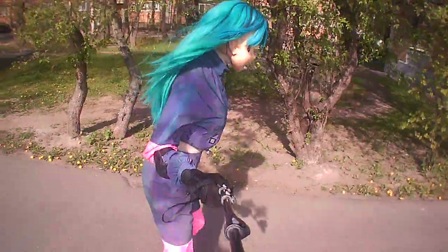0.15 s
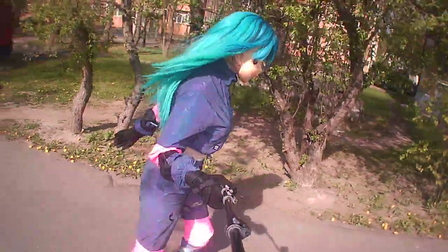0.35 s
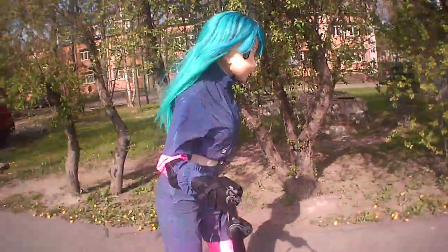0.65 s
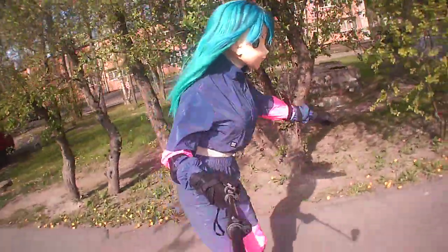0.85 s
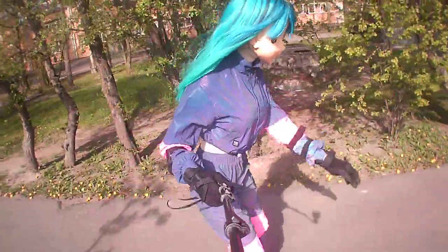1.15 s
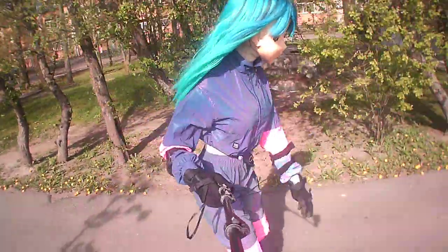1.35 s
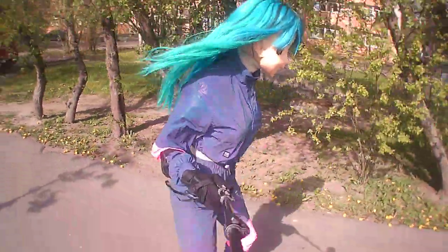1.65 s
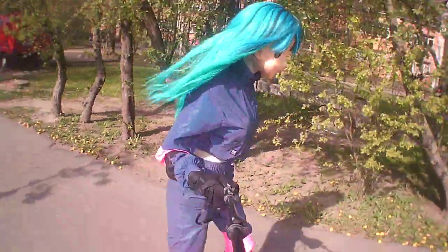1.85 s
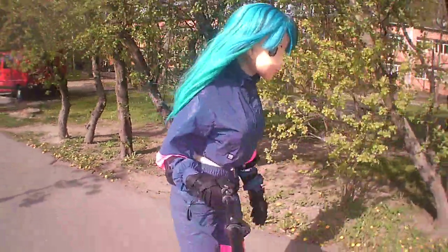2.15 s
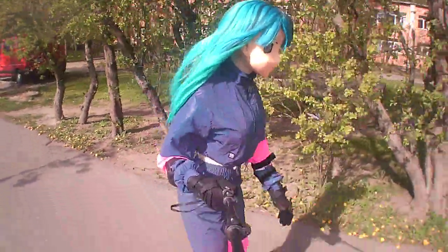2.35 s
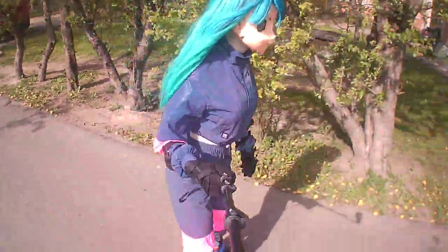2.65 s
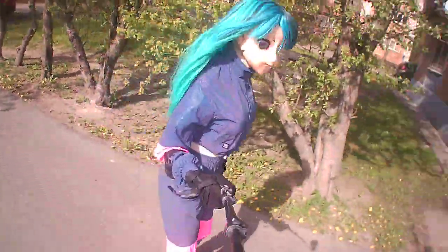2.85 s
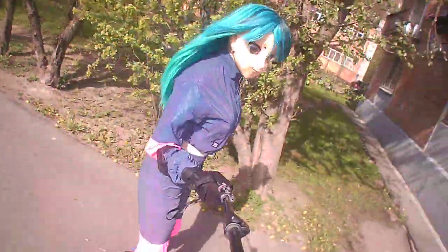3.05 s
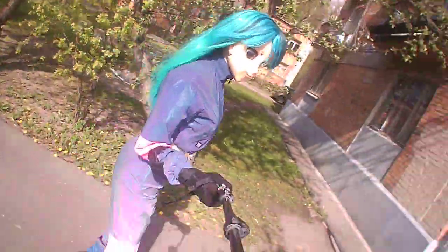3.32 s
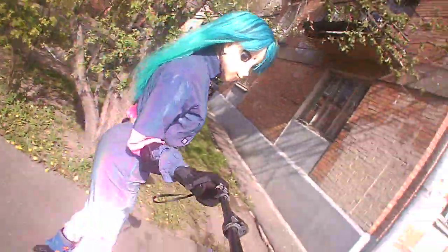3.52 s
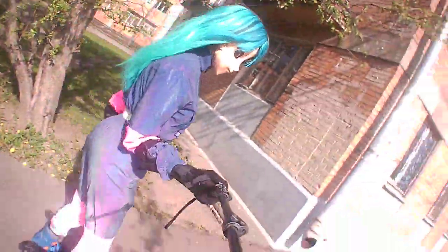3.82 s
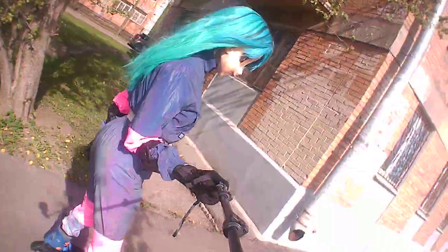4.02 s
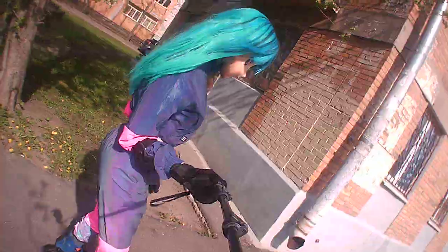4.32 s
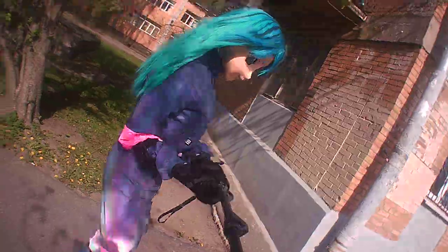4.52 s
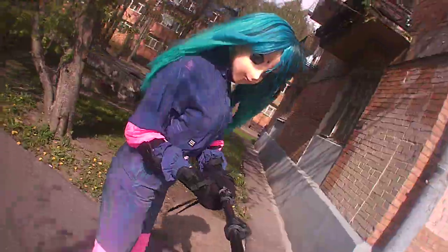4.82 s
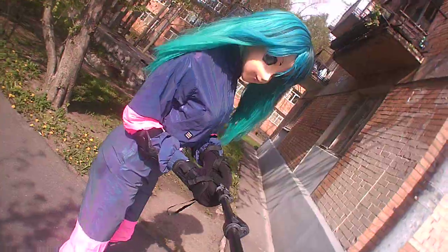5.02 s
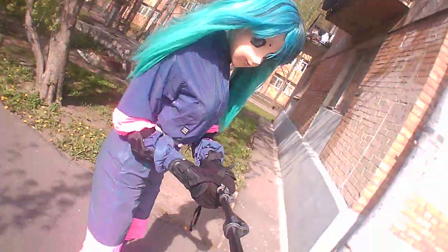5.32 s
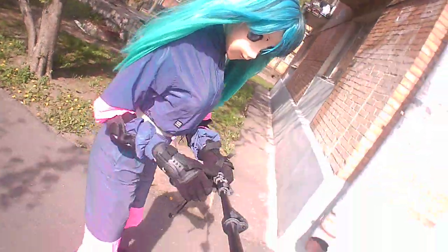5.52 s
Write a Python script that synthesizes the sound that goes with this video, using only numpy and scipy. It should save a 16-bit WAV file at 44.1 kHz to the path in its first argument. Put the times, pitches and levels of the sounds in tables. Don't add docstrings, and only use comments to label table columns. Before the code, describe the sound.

Heavy handling noise from a camera on a pole: deep overloaded thumps, plastic clamp knocks and scrapes, over faint wheel rumble outdoors.

```python
import sys
import numpy as np
from scipy import signal
from scipy.fft import rfft, irfft, next_fast_len
from scipy.io import wavfile
from scipy.ndimage import uniform_filter1d, map_coordinates

SR = 44100
rng = np.random.default_rng(int(sys.argv[2]) if len(sys.argv) > 2 else 0)


def volts_from_decibels(level):
    exponent = np.asarray(level, float) / 20
    return 10 ** exponent


def to_wav(s):
    ch = np.atleast_2d(s).T
    pcm = np.round(np.clip(ch, -1, 1) * 32767)
    wavfile.write(sys.argv[1], SR, pcm.astype(np.int16))


N = 250036
T = np.arange(N) / SR


def unit(x):
    return x / np.sqrt(np.mean(x ** 2) + 1e-20)


def curves(rows):
    s, *columns = np.transpose(rows)
    return [np.interp(T, s, column) for column in columns]


def wobble(rate):
    return map_coordinates(rng.standard_normal(int(N * rate / SR) + 4), [T * rate])


def filtered(x, response):
    m = next_fast_len(N + SR // 2)
    return irfft(rfft(x, m) * response(np.fft.rfftfreq(m, 1 / SR)), m)[:N]


def noise(spectrum):
    f, db = np.transpose(spectrum)

    def colour(hz):
        return volts_from_decibels(np.interp(np.log(hz + 1), np.log(f + 1), db))
    return unit(filtered(rng.standard_normal(N), colour))


def resonant(x, modes, damping):
    def response(f):
        total = 0
        for k, (hz, db, t60) in enumerate(modes):
            width = damping * np.log(1000) / (np.pi * t60)
            total = total + (-1) ** k * volts_from_decibels(db) * 1j * f * width / (hz * hz - f * f + 1j * f * width)
        return total
    return unit(filtered(x, response))


def grit(rate, clump_db):
    sizes = rng.standard_normal(N) * volts_from_decibels(np.minimum(3 * rng.exponential(size=N), 8))
    return (rng.random(N) < rate / SR) * sizes * volts_from_decibels(clump_db * np.tanh(wobble(90)))


def soft(x, hz):
    return filtered(x, lambda f: 1 / (1 + 1j * f / hz) ** 2)


# start in seconds, signed size (1 = full scale), swing in Hz, t60 in seconds.
JOLTS = [(0.5605, 1.01, 16.6, 0.6), (0.6065, -0.62, 22.3, 0.949), (0.6451, -2.44, 39.4, 0.113),
         (1.1659, 2.23, 16.1, 0.105), (1.8202, -1.5, 9.9, 0.167), (1.9463, 0.98, 40.1, 0.439),
         (1.948, -3.77, 17.7, 0.563), (1.9867, 5.94, 12.9, 0.251), (2.0587, -0.68, 7.5, 0.603),
         (2.1532, -1.47, 6.9, 0.84), (2.2909, 0.72, 27.0, 0.302), (2.4882, -0.55, 5.0, 0.96),
         (2.5869, 0.53, 18.4, 0.369), (2.828, 2.56, 17.8, 0.447), (2.8458, -3.61, 35.0, 0.06),
         (2.8821, -0.52, 39.2, 0.354), (2.9436, -0.85, 19.5, 0.411), (4.2298, 1.15, 13.8, 0.137),
         (4.5869, 1.14, 24.2, 0.163), (4.678, 0.67, 39.8, 0.181), (4.6955, -0.79, 13.4, 0.659),
         (4.7298, -6.0, 18.6, 0.585), (4.8084, -3.38, 26.1, 0.253), (4.8192, 1.62, 32.1, 0.553),
         (4.9859, 0.71, 11.6, 0.272), (5.0943, -0.76, 24.7, 0.96), (5.1471, -2.5, 14.9, 0.874),
         (5.1837, -0.53, 37.8, 0.445), (5.3161, -0.72, 16.8, 0.96), (5.362, -0.66, 9.2, 0.956)]
LEFTOVER = (-.022, -.34, 11, .3)
# start in seconds, signed size (1 =
# full scale), swing in Hz.
SHORT_SWINGS = [(0.529, 0.19, 11.7), (0.5806, -0.76, 53.2), (0.5854, 1.33, 121.7), (0.743, -0.58, 18.6),
                (1.1238, 0.36, 13.4), (1.1705, 0.71, 82.2), (1.207, -0.35, 9.5), (1.8045, -0.17, 88.8),
                (1.9515, -2.88, 61.4), (2.191, 0.25, 45), (2.3128, -0.38, 41.9), (2.5324, -0.37, 20.3),
                (2.8737, -0.57, 100.1), (2.9089, -1.01, 32.8), (3.0491, 0.6, 20.7), (3.4641, 0.63, 14.1),
                (3.5776, 0.24, 35.3), (4.2277, 0.36, 97.9), (4.2462, 0.39, 88.7), (4.3402, -0.4, 12.0),
                (4.5761, -0.78, 43.6), (4.6147, -0.33, 90.9), (4.7451, 2.4, 44.4), (4.8594, -0.72, 41.8),
                (4.9092, 0.81, 53.6), (5.2152, -0.39, 75.8), (5.3873, 0.32, 8.9), (5.3932, -0.59, 46.6),
                (5.4733, -0.82, 19.4), (5.628, 0.79, 22.0),
                (0.7002, -0.48, 47.6), (0.7664, -0.29, 14.0), (1.1823, -0.52, 21.8), (1.8753, -0.31, 34.1),
                     (1.9379, 0.47, 21.8), (2.3025, 0.45, 17.5), (2.5125, -0.33, 21.8), (2.5438, 0.78, 19.5),
                     (2.6109, -0.52, 12.5), (4.576, -0.35, 17.5), (4.6163, -0.44, 8.9), (4.6399, 0.45, 47.6),
                     (4.6875, 0.51, 83.2), (4.7451, 0.9, 42.6), (4.9143, 0.42, 11.2), (4.9773, -0.34, 38.1),
                     (5.0349, -0.74, 42.6), (5.073, 0.38, 38.1), (5.0948, 0.52, 27.3), (5.1383, -0.41, 53.3),
                     (5.2444, 0.56, 53.3), (5.3061, 0.34, 42.6), (5.3655, 0.37, 27.3),
                (.556, -.4, 35), (.6255, .35, 60), (.65, .6, 45), (.664, .3, 12), (1.14, .35, 6.5),
                    (2.15, .32, 2.5), (2.16, .3, 12), (2.851, -.25, 25), (2.016, .25, 60), (2.066, -.2, 30),
                    (2.919, -.4, 30), (3.559, .22, 60), (4.713, -.6, 30), (4.7415, 1.3, 48), (4.7425, .4, 40),
                    (4.7548, .7, 125), (4.753, -.35, 36), (4.8, -.2, 30), (5.085, -.45, 6.5), (5.166, .85, 40),
                    (5.258, .35, 14), (5.401, .35, 22)]


def jolts():
    cycles_to_die = 4
    short_swings = [(s, size, hz, cycles_to_die / hz) for s, size, hz in SHORT_SWINGS]
    swing = np.zeros(N)
    for s, size, hz, t60 in [LEFTOVER] + JOLTS + short_swings:
        first = max(round(s * SR), 0)
        t = T[first:first + round(t60 * SR)] - s
        swing[first:first + len(t)] += size * np.sin(2 * np.pi * hz * t) * volts_from_decibels(-60 * t / t60)
    return swing


def unrest(swing):
    fast_per_s = 64
    speed = np.abs(np.gradient(swing)) * SR
    return np.tanh(uniform_filter1d(speed, SR // 30) / fast_per_s)


# time in seconds, strength in dB.
AIR = [(0, -7.5), (.13, -16), (.5, -20), (1, -21.5), (1.2, -12), (1.55, -26), (1.9, -12), (2.35, -18),
       (2.55, -6.5), (2.85, -17.5), (3.1, -22.5), (3.55, -24), (4.1, -15.5), (4.35, -24), (4.6, -10.5),
       (4.85, -22.5), (5.1, -10.5), (5.67, -25)]
# frequency in Hz, level in dB per Hz.
SWAY_COLOUR = [(2, -49.5), (6, 11.5), (18, 14), (28, 4), (45, 0), (70, -89)]
BUFFET_COLOUR = [(25, -55.5), (55, -15), (80, -14.5), (150, -31), (400, -52.5), (1500, -110)]


def pole(swing):
    buffet_db, buffet_grows, stirred_db = -32.5, 0.45, 39.5
    loose = 1 / (1 + 4 * uniform_filter1d(np.abs(swing), SR // 12))
    sway_db, = curves(AIR)
    mean_db = sway_db.mean()
    gust_db = mean_db + buffet_db + buffet_grows * (sway_db - mean_db) + stirred_db * unrest(swing)
    sway = volts_from_decibels(sway_db) * noise(SWAY_COLOUR)
    buffet = unit(volts_from_decibels(0.88 * np.tanh(wobble(22))) * noise(BUFFET_COLOUR))
    rounded = signal.filtfilt(*signal.butter(1, 300, fs=SR), swing)
    return rounded + loose * (sway + volts_from_decibels(gust_db) * buffet)


# start in seconds, peak of the main modes in dB, then low, middle and bright modes in dB.
BLOWS = [
    (1.9497, -13.5, -9, -9, -5.5),
    (4.7245, 9.5, -11, -9, -22.5),
    (4.756, -11.5, -7, -5.5, -21.5),
    (5.171, -16.5, -2.5, -5.5, -38),
]
# start in seconds, peak of the main modes in dB, low modes in dB,
# middle modes in dB, tilt of the main modes in dB an octave.
KNOCKS = [(0.2763, -24.5, -15.5, -17, 22), (0.372, -52.5, 6.5, 7.5, -1), (0.449, -45.5, -3.5, -4, -5),
          (0.561, -22.5, -7.5, -5, -12), (0.623, -21, -8, -6.5, 5), (0.8938, -41.5, -6, -11, .1),
          (0.9829, -38.5, -13.5, -12, 9), (1.1211, -39.5, 7.5, 0.5, 4), (1.1405, -27.5, -1.5, -5, 10),
          (1.1653, -28.5, -17, -5, 4), (1.201, -34.5, -11, -8.5, 5), (1.6629, -41.5, -19, -14.5, 9),
          (1.8, -32, -7, -12, -3), (1.8477, -37, -8.5, -10, 1), (1.9415, -25.5, -9, -12, 8),
          (2.038, -34.5, -10, -13, 3), (2.0601, -27, -9, -14, 11.5), (2.1927, -33, -6, -9.5, -5),
          (2.641, -38.5, -20.5, -21, 10), (2.7763, -34, 2.5, -3, 5), (2.876, -26.5, -5, -15, -6),
          (2.9199, -34, 0, -12, -1), (3.054, -35.5, -6.5, -6, 4), (3.2762, -52, -2, 6, .1),
          (3.3174, -40, -16, -16, 8), (3.4229, -23.5, -26, -9, 27), (3.5058, -36.5, -19, 1, 2),
          (3.5585, -35.5, 10.5, 1, -1), (3.8003, -39, -33, 0, -2), (4.234, -18, -20, -11.5, -34),
          (4.474, -41, -6.5, -6, 1), (4.567, -33, 1, -1, 6), (4.636, -42, 9.5, -2, -3.5),
          (4.683, -27.5, 1.5, -14, 2), (4.7463, -18, -11.5, -7, 7), (4.966, -33, -14, -19, 13),
          (5.096, -38, -1.5, -12, 2), (5.2709, -25.5, -4, -7, -5), (5.305, -25, -6.5, -8, 2)]
# start in seconds, peak of the main modes in dB,
# low modes in dB, bright modes in dB, share of the free ring time.
SNAPS = [(0.4847, -31.5, -3.5, -9.5, 0.33), (0.5668, -13, -8.5, -18, 0.29), (0.659, -23.5, -18, -18, 0.28),
         (0.7018, -47, -6, -8.5, .4), (1.3922, -43, -8, -17, 0.89), (2.0547, -20.5, -26, -8.5, 0.29),
         (2.124, -35, -3.5, -23, 0.25), (2.2872, -23, -11, -15, 0.33), (2.8463, -28.5, 5, -15, 0.091),
         (2.8908, -18, -6.5, -10.5, 0.23), (2.929, -30.5, -0.5, -9.5, 0.23), (3.4467, -33, -4.5, -17, 0.77),
         (4.7616, -22, -16, -11, .15), (4.7638, -3, -18, -12.5, 0.114), (4.9143, -14.5, -7, -19, 0.19)]
# start in seconds, peak of the main modes in dB.
TAPS = [(0.049, -51.5), (0.183, -53.5), (0.3268, -50), (0.342, -47.5), (0.388, -50), (1.273, -60),
        (1.3348, -51.5), (1.8184, -45), (2.08, -46), (2.158, -44.5), (2.434, -55), (2.475, -40.5),
        (2.525, -42.5), (2.5364, -46), (2.591, -52), (2.61, -52.5), (2.957, -57), (2.985, -47),
        (2.687, -50.5), (2.968, -47), (2.9994, -38.5), (3.204, -49), (3.297, -43.5), (3.598, -52.5),
        (3.663, -49), (4.0343, -57.5), (5.475, -49.5), (5.6205, -40.5)]
SLIPS = [(1.62, -57.5), (1.646, -44.5), (1.2035, -34.5), (2.019, -37), (3.466, -49), (4.461, -52.5),
         (4.503, -52), (5.279, -28), (5.287, -28.5), (5.315, -30), (5.326, -30), (5.336, -33), (5.343, -37),
         (5.352, -39.5)]


def contacts():
    hard_db, dulling = -15, 1.5
    snap_low_top_db = 6
    rows = []
    for s, db, low_db, middle_db, bright_db in BLOWS:
        tilt_db = -max(db - hard_db, 0) * dulling
        rows.append((s, db, low_db, middle_db, bright_db, tilt_db, 0.54))
    for s, db, low_db, middle_db, tilt_db in KNOCKS:
        rows.append((s, db, low_db, middle_db, -27, tilt_db, 0.95))
    for s, db, low_db, bright_db, ring in SNAPS:
        rows.append((s, db, min(low_db, snap_low_top_db), -10.5, bright_db, 0, ring))
    for s, db in TAPS:
        rows.append((s, db, -6.5, -8.5, -25, 0, 0.95))
    for s, db in SLIPS:
        rows.append((s, db, -6.5, -8.5, -28, 0, 0.64))
    return rows


# frequency in Hz, level in dB, t60 in seconds.
THUD_MODES = [(120, -3, 0.0094), (240, 3, 0.099)]
LOW_MODES = [(242, 0.5, 0.06), (435, -30, 0.011), (610.3, 7, 0.031), (624, -1.5, 0.019)]
MIDDLE_MODES = [(881, -9.5, 0.1), (999, 1, 0.043), (1020, 3.5, 0.01)]
MAIN_MODES = [(1444, 7.5, 0.025), (1580, 2.5, 0.025), (1782, 3.5, 0.029), (2010, -15, 0.048),
              (2550, -22.5, 0.015)]
BRIGHT_MODES = [(2400, -18.5, 0.0078), (3007, 3.5, 0.019), (3000, -21.5, 0.015), (3800, -6, 0.012),
                (4070, -0.5, 0.014), (5060, -16, 0.0055), (5630, -5, 0.01), (7300, -20, 0.018),
                (9000, -22.5, 0.0061)]


def clamp():
    out, t = np.zeros(N + SR), np.arange(SR // 12) / SR
    onset = 1 - np.exp(-(t / 0.00057) ** 2)
    for s, db, low_db, middle_db, bright_db, tilt_db, ring in contacts():
        free = np.clip(ring, .1, 1.5)
        groups = []
        for modes in (THUD_MODES, LOW_MODES, MIDDLE_MODES, MAIN_MODES, BRIGHT_MODES):
            hz, level, t60 = np.transpose(modes)[:, :, None]
            level_scatter, pitch_scatter = rng.standard_normal((2, len(modes), 1))
            if modes is MAIN_MODES:
                level = level + tilt_db * np.log2(hz / hz[0])
            fade = volts_from_decibels(level + 2.2 * level_scatter - 60 * t / (free * t60))
            tones = np.sin(2 * np.pi * hz * (1 + 0.031 * pitch_scatter) * t)
            groups.append((fade * tones).sum(0))
        chatter = (rng.random(400) < .03) * rng.standard_normal(400)
        chatter = chatter * volts_from_decibels(-60 * t[:400] / (0.027 * free)) * 0.9
        chatter[0] = 1
        groups = signal.fftconvolve(onset * np.array(groups), chatter[None], axes=1)[:, :len(t)]
        group_db = np.array([low_db - 6, low_db + 6, middle_db + 4, 0, bright_db + 5])
        out[round(s * SR):][:len(t)] += volts_from_decibels(db + 2.5 + group_db) / np.abs(groups).max(1) @ groups
    return out[:N]


# start in seconds, then levels in dB of the four clear modes in the order below.
RINGS = [(0.2773, -40, -36.5, -32, -36), (0.8934, -51, -50.5, -48, -47), (0.9827, -47, -55, -48.5, -47.5),
         (1.6626, -43.5, -59, -53, -43), (1.7993, -42, -39.5, -42, -38), (3.4239, -26.5, -42, -31, -35),
         (3.5039, -33.5, -40, -26, -37), (3.5574, -40, -22.5, -35, -37.5), (3.8002, -32.5, -44, -29.5, -34)]
# frequency in Hz, t60 in seconds.
CLEAR_MODES = [(1558, 0.033), (630, 0.057), (1017, 0.036), (1858, .036)]
# frequency in Hz, level over the strong mode in dB, t60 in seconds.
TIED_MODES = [(3230, -23, .03), (755, -8.5, 0.063), (884, -12.5, .09), (2090, -13, 0.049)]


def rings():
    out, t = np.zeros(N), np.arange(SR // 10) / SR
    hz, t60 = np.transpose(CLEAR_MODES)[:, :, None]
    tied_hz, tied_db, tied_t60 = np.transpose(TIED_MODES)[:, :, None]
    swell = 1 - np.exp(-(t / 0.0013) ** 2)
    for s, *levels_db in RINGS:
        bend = 1 + .008 * rng.standard_normal((2, 4, 1))
        phase = 2 * np.pi * rng.random((2, 4, 1))
        strong = volts_from_decibels(-60 * t / t60) * np.sin(2 * np.pi * hz * bend[0] * t + phase[0])
        weak = volts_from_decibels(tied_db - 60 * t / tied_t60) * np.sin(2 * np.pi * tied_hz * bend[1] * t + phase[1])
        out[round(s * SR):][:len(t)] += volts_from_decibels(np.array(levels_db) + 5) @ (strong + weak) * swell
    return out


# time in seconds, signed size (1 = full scale).
CATCHES = [(0.182, .05), (0.672, -0.12), (.702, -0.097), (.706, -0.072), (0.752, -0.035), (0.797, -0.045),
           (0.8264, 0.0046), (1.192, -0.28), (1.1997, -0.15), (2.1509, 0.058), (2.155, 0.055),
           (2.2035, 0.033), (2.248, 0.14), (2.277, 0.044), (2.297, -0.038), (2.3112, 0.026),
           (2.3296, 0.092), (2.346, 0.096), (2.543, -0.052), (2.8486, -0.58), (2.911, -0.15),
           (4.6737, -0.27), (4.708, -0.35), (4.7642, -1.82), (4.233, 0.23), (4.244, -0.43), (4.253, -0.18),
           (5.399, -0.23), (5.409, 0.028), (5.4769, -0.098), (5.486, -0.17)]


def catches():
    rise_s, fall_s = 0.00075, 0.00088
    s, size = np.transpose(CATCHES)
    t = np.arange(-400, 400) / SR
    cusp = np.exp(np.where(t < 0, t / rise_s, -t / fall_s))
    marks = np.bincount(np.round(s * SR).astype(int), size, N)
    return soft(signal.fftconvolve(marks, cusp, "same"), hz=2400)


# start and end in seconds, level at start and at end in dB, hollow share in dB.
SCRAPES = [(0.493, 0.533, -44.5, -44.5, 12.5), (0.538, 0.573, -37, -32, 4.5),
           (0.592, 0.653, -42, -53.5, 17), (1.085, 1.113, -49, -56, 15.5), (1.121, 1.205, -48, -42.5, 5.5),
           (1.8, 1.868, -52.5, -100, 23.5), (1.886, 1.963, -53.5, -43, -4),
           (1.962, 2.027, -33.5, -42.5, 5.5), (2.03, 2.102, -55, -53.5, 9.5),
           (2.239, 2.244, -46.5, -48.5, 2), (2.768, 2.808, -50, -40.5, 0), (2.812, 2.851, -41, -36, 2.5),
           (2.86, 2.936, -54, -41.5, 8), (3.033, 3.08, -49, -64, 3), (4.225, 4.271, -42.5, -61.5, 14),
           (4.565, 4.588, -36, -39, 6), (4.59, 4.658, -50.5, -45.5, 17), (4.66, 4.68, -40, -36, 2),
           (4.684, 4.722, -29, -43, -1), (4.74, 4.793, -29.5, -23.5, -3), (4.819, 4.856, -20, -29.5, 4.5),
           (4.869, 4.91, -42, -26, -2), (4.921, 4.967, -38.5, -48, 7), (4.979, 5.079, -41.5, -46.5, 3),
           (5.082, 5.14, -46, -39, 8), (5.155, 5.243, -25, -39.5, 12), (5.261, 5.301, -39.5, -35, 7),
           (5.313, 5.347, -38.5, -39, 9.5), (5.348, 5.386, -47, -53.5, 12), (5.38, 5.434, -48.5, -51.5, 8),
           (5.514, 5.589, -49, -38, 0.5)]
# frequency in Hz, level in dB, t60 in seconds.
RUBBING_MODES = [(1127, -6, 0.013), (1474, 2.5, 0.029), (1871, -2.5, 0.02), (2314, -13.5, 0.023),
                 (3000, -23, 0.021), (4000, -27, 0.008)]
HOLLOW_MODES = [(173, -0.5, 0.032), (240, 0, 0.047), (465, -7.5, 0.047), (692, -8, 0.024)]


def scrape():
    sharpen, sharp_from_db = 0.091, -38.5
    ticks = soft(grit(3200, clump_db=6), hz=2600)
    rub = resonant(ticks, RUBBING_MODES, damping=0.77)
    hollow = resonant(ticks, HOLLOW_MODES, damping=1.3)
    edge = rub - soft(rub, hz=3060)
    out = np.zeros(N)
    for start, end, from_db, to_db, hollow_db in SCRAPES:
        near = slice(round(start * SR) - 400, round(end * SR) + 400)
        inside = np.clip(np.minimum(T[near] - start, end - T[near]) / 0.0011 + .5, 0, 1)
        level_db = np.interp(T[near], [start, end], [from_db, to_db])
        edge_gain = volts_from_decibels(np.minimum(sharpen * (level_db - sharp_from_db), 3)) - 1
        rubbed = rub[near] + edge_gain * edge[near]
        out[near] += inside * volts_from_decibels(level_db) * (rubbed + volts_from_decibels(hollow_db) * hollow[near])
    return out


# start and end in seconds, peak in dB, frequency in Hz.
SHUDDERS = [(0.494, 0.52, -39.5, 390), (2.769, 2.787, -24, 205), (3.55, 3.597, -34.5, 190),
            (4.462, 4.491, -35.5, 249), (5.105, 5.131, -34, 240), (5.334, 5.354, -31, 300),
            (5.35, 5.393, -21, 258.8)]


def shudders():
    out = np.zeros(N)
    for start, end, db, hz in SHUDDERS:
        u = np.clip((T - start) / (end - start), 0, 1)
        swell = np.sin(np.pi * u ** 1.6)
        out += volts_from_decibels(db) * swell * np.sin(2 * np.pi * hz * T)
    return out


# start and end in seconds, peak in dB,
# frequency in Hz.
FIZZES = [(0.507, 0.545, -55, 2570), (0.573, 0.594, -51, 3400), (1.143, 1.149, -61, 3000),
          (2.014, 2.018, -44.5, 3800), (2.055, 2.063, -50.5, 3300), (3.503, 3.513, -56.5, 3900),
          (3.8, 3.807, -60.5, 3900), (4.755, 4.757, -45, 3400)]


def fizz():
    out, ticks = np.zeros(N), grit(2500, clump_db=6.5)
    for start, end, db, hz in FIZZES:
        u = np.clip((T - start) / (end - start), 0, 1)
        bright = resonant(soft(ticks, hz=5000), [(hz, 0, .0022)], damping=0.8)
        out += volts_from_decibels(db) * np.sin(np.pi * u) ** .5 * bright
    return out


# start in seconds, peak in dB.
PINGS = [(0.5683, -44), (2.5413, -35), (2.8484, -18), (4.2436, -27), (4.617, -27.5), (4.6733, -32),
         (4.6926, -21.5), (4.709, -37), (4.7805, -34)]


def diaphragm():
    out, t = np.zeros(N), np.arange(SR // 100) / SR
    ping = volts_from_decibels(-60 * t / 0.0044) * np.sin(2 * np.pi * 8900 * t)
    ping += 0.2 * volts_from_decibels(-60 * t / 0.0082) * np.sin(2 * np.pi * 5600 * t)
    for s, db in PINGS:
        out[round(s * SR):][:len(t)] += volts_from_decibels(db - 8) * ping
    return out


# time in seconds, level in dB.
ROAD = [(0.0, -59), (0.39, -60.5), (0.61, -58), (1.63, -65.5), (2.05, -57.5), (2.19, -60.5), (2.32, -66.5),
        (2.54, -68.5), (2.73, -56), (2.92, -53), (4.06, -70), (4.55, -62.5), (4.71, -35.5), (4.77, -35.5),
        (4.94, -54.5), (5.3, -44), (5.51, -51), (5.67, -49)]
# frequency in Hz, level in dB, t60 in seconds.
HOUSING_MODES = [(256, 0, .07), (600, -12, .05)]


def road(swing):
    buzz_db, buzz_grows = -67.5, 0.73
    drummed_db = 11.5
    rough_db, = curves(ROAD)
    buzz = resonant(soft(grit(1400, clump_db=1), hz=2200), MIDDLE_MODES + MAIN_MODES, damping=1)
    drumming = resonant(soft(grit(1500, clump_db=4), hz=400), HOUSING_MODES, damping=1.2)
    buzz = volts_from_decibels(buzz_db + buzz_grows * (rough_db - rough_db.mean())) * buzz
    return buzz + volts_from_decibels(rough_db + drummed_db * unrest(swing)) * drumming


def scene():
    swing = jolts()
    handling = pole(swing) + clamp() + rings() + catches()
    slipping = scrape() + shudders() + fizz()
    return (handling + slipping + diaphragm() + road(swing))[None]


# frequency in Hz, level in dB per Hz.
HISS_COLOUR = [(150, -20), (400, -4), (2400, 0), (5000, -1), (9000, -1), (13000, -5), (15700, -10)]
# multiple of the clock, level in dB.
WHINE = [(1, -84), (2, -85), (3, -86), (4, -92), (5, -89), (6, -87), (7, -94)]


def circuit():
    clock_hz = 1405.7
    whine = np.zeros(N)
    for k, db in WHINE:
        whine += volts_from_decibels(db + 1.5) * np.sin(2 * np.pi * k * clock_hz * T + 0.18 * k * wobble(18))
    return volts_from_decibels(-74) * noise(HISS_COLOUR) + whine


def low_pass(x):
    return signal.sosfilt(signal.butter(12, 16530, fs=SR, output="sos"), x)


def record(dry):
    full, top_hz = .707, 15750
    cut = np.clip(dry[0] + circuit(), -full, full)
    band = filtered(np.pad(cut, (0, 600), "edge"), lambda f: 1 / (1 + (f / top_hz) ** 200))
    return low_pass(band[None])


dry = scene()
out = record(dry)
to_wav(out)
```